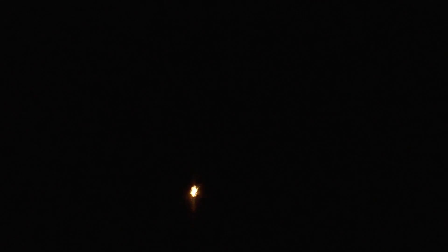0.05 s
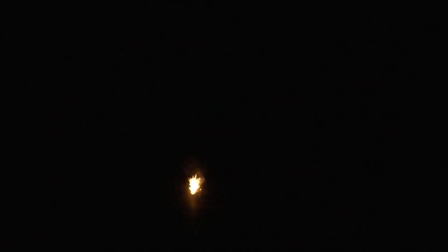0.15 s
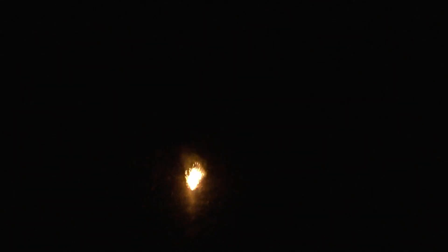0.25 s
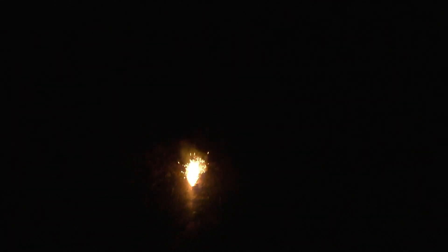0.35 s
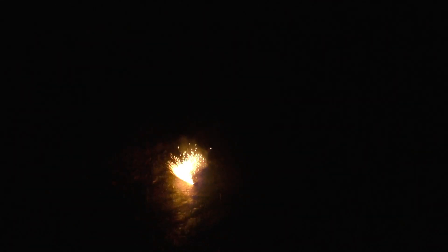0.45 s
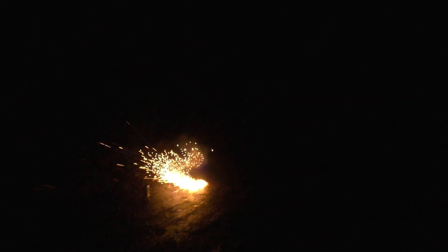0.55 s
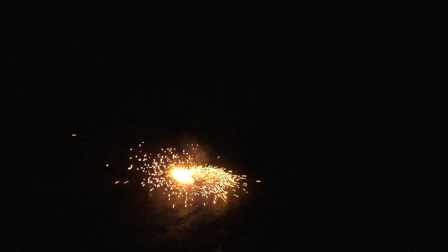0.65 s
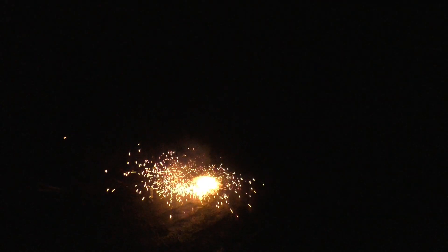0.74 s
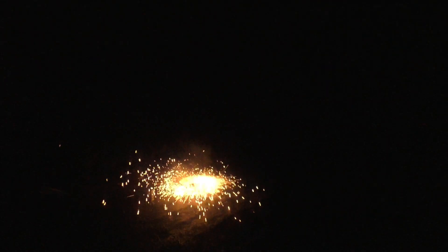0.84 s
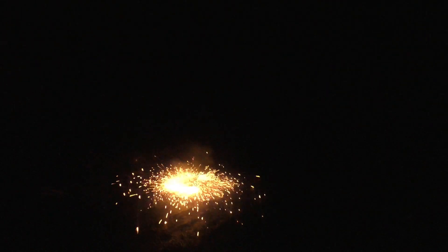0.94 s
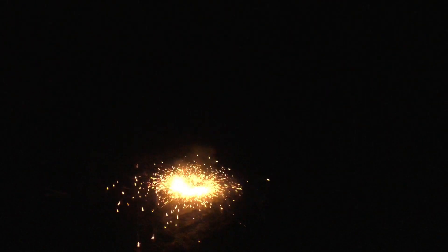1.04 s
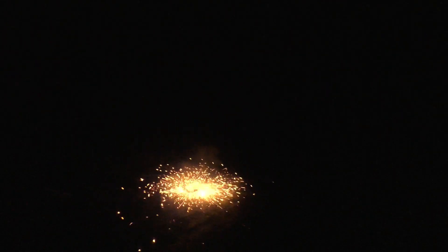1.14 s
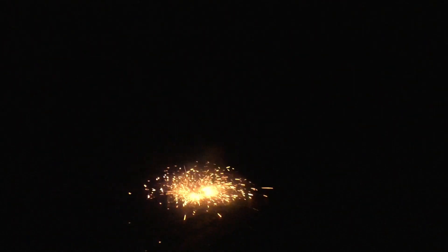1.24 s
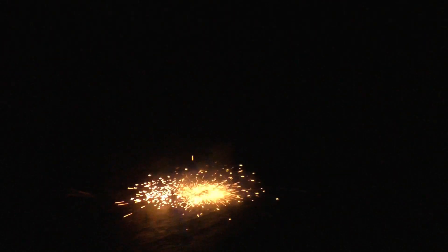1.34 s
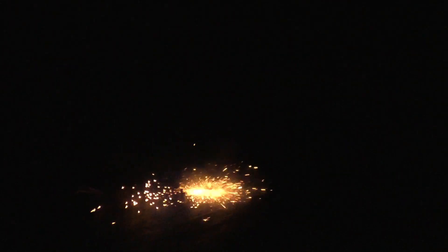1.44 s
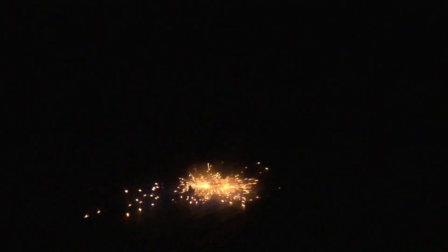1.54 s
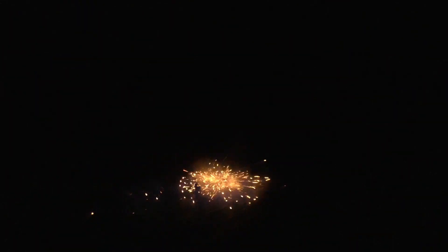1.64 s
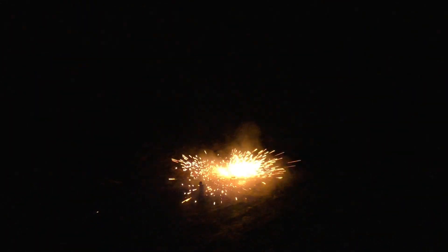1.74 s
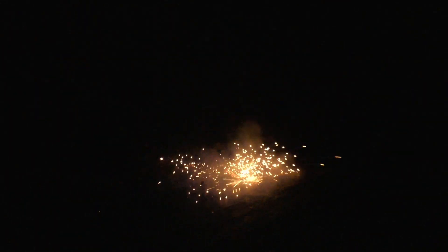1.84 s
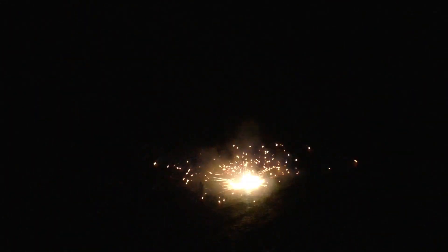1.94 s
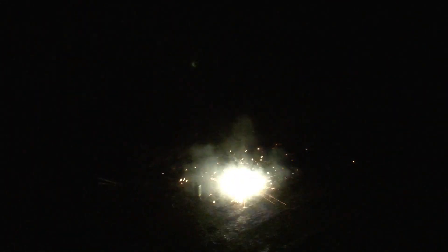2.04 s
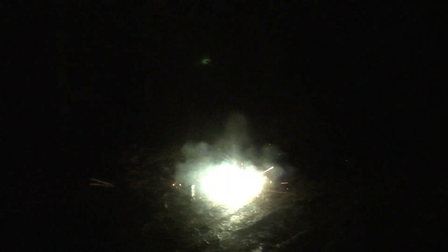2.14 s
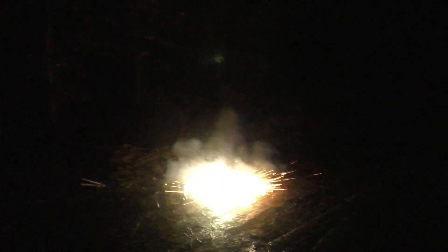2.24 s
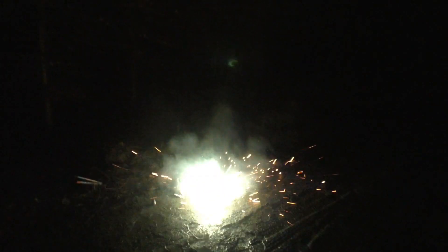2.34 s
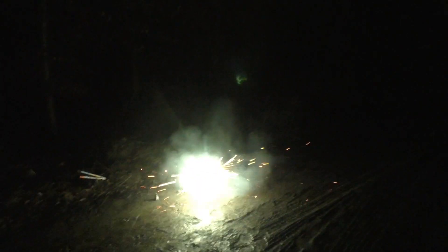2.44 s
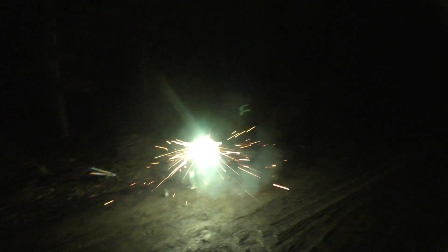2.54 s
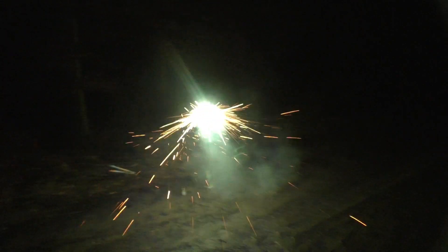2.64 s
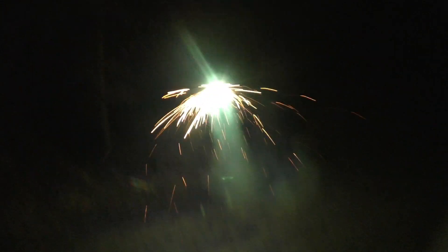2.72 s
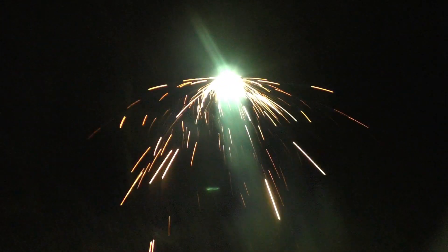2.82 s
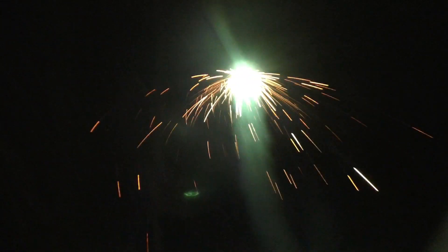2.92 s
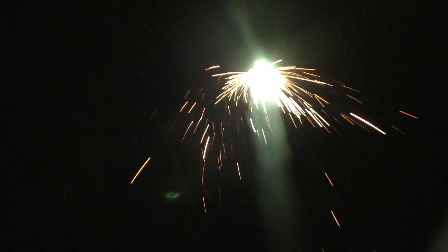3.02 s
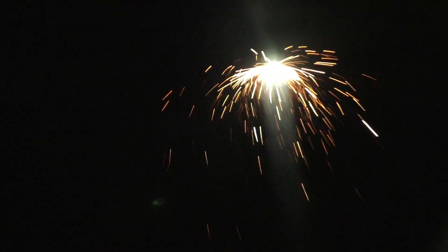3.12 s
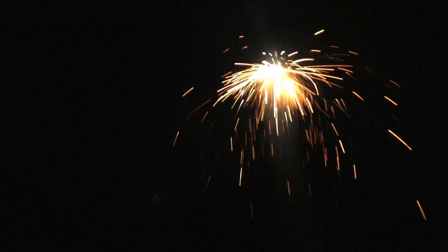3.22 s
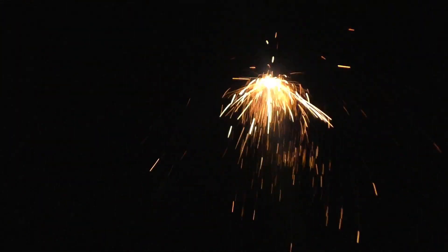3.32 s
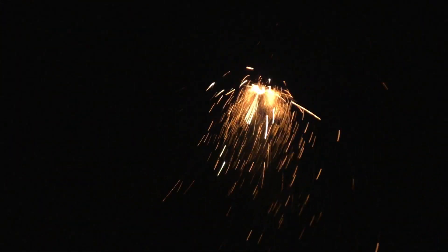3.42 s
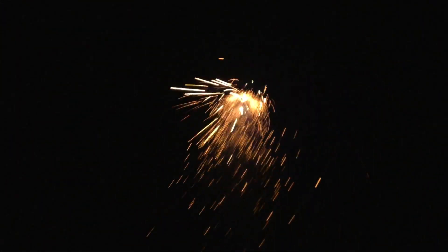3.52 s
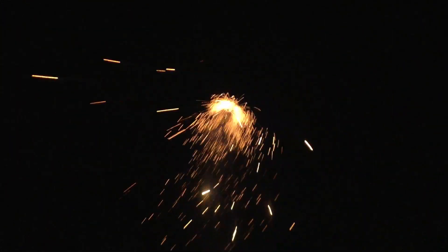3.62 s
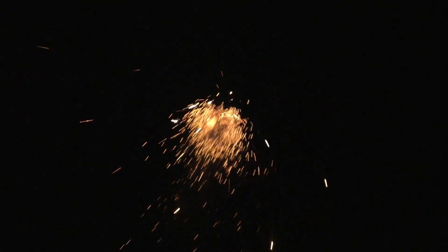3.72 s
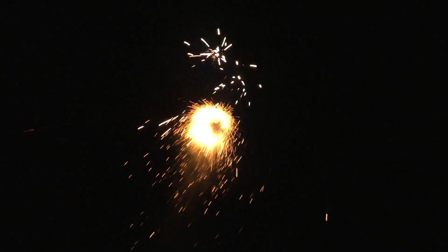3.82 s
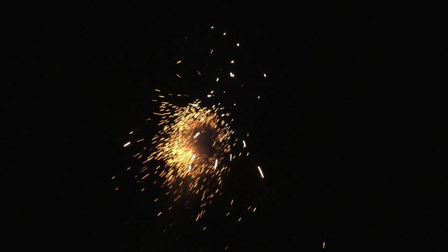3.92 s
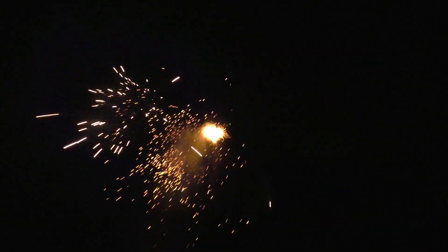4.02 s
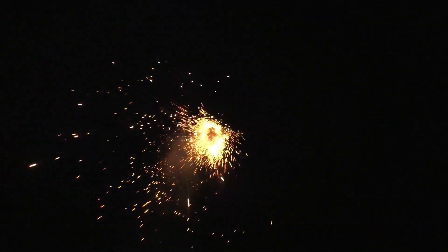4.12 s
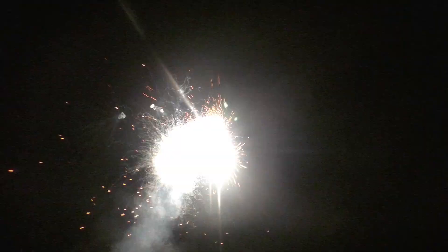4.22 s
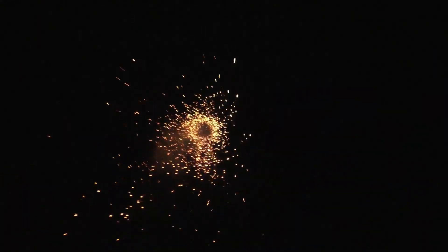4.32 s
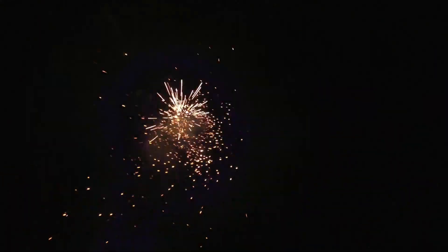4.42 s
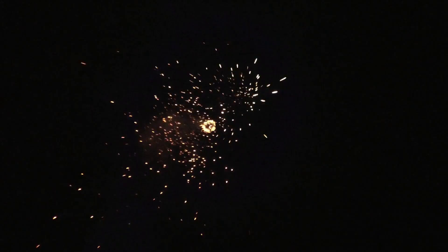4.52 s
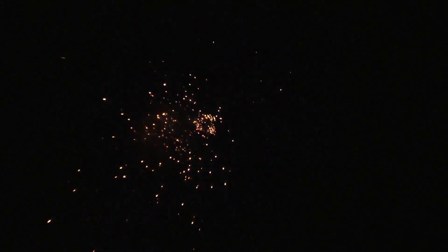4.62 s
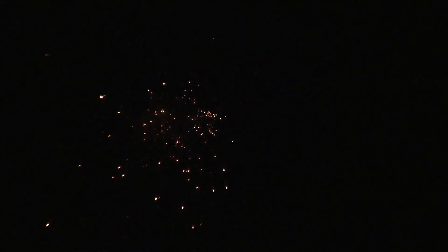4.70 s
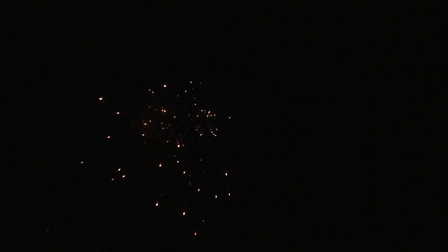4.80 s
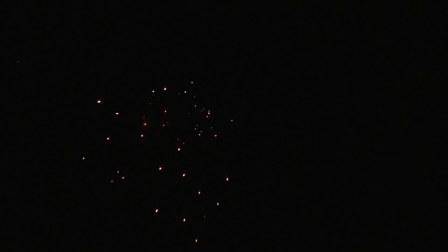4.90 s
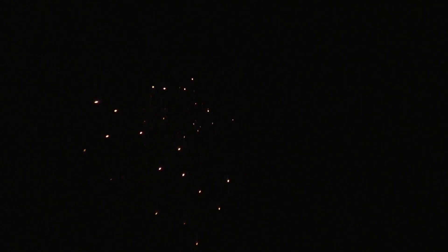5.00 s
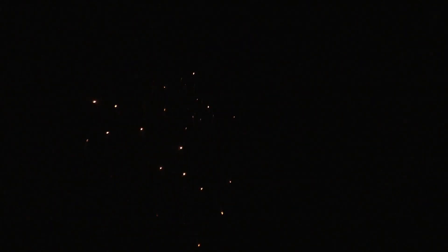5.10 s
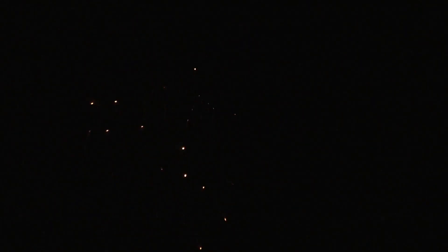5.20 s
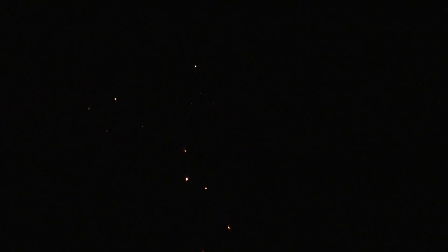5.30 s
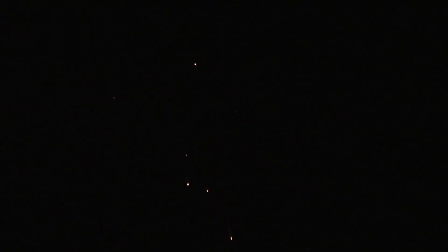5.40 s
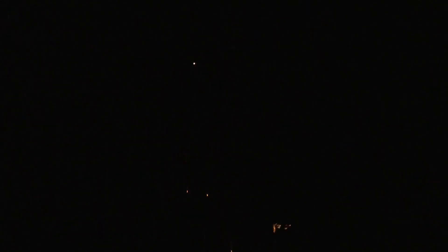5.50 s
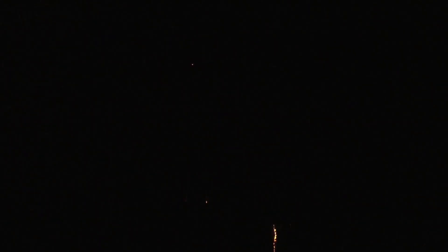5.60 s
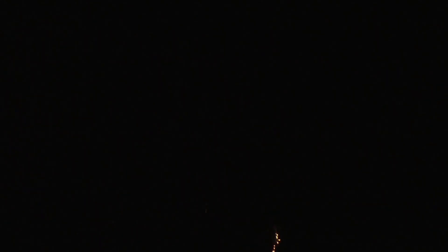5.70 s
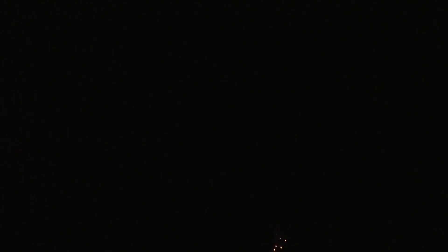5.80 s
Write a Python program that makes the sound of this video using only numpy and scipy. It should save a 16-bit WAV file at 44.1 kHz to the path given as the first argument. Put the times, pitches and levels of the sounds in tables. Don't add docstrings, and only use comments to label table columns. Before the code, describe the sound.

Thin fuse fizz swells into a fluttering, roaring hiss that rises and thins, then about twenty hard, overloaded pops ring off trees and walls.

```python
import sys
import numpy as np
from scipy import signal
from scipy.io import wavfile
from scipy.ndimage import uniform_filter1d, map_coordinates

SR = 44100
rng = np.random.default_rng(int(sys.argv[2]) if len(sys.argv) > 2 else 0)


def gain_from_db(level_db):
    decades = np.asarray(level_db, float) / 20
    return 10 ** decades


def unload_audio(sound):
    columns = np.transpose(np.atleast_2d(sound))
    steps = np.round(np.clip(columns, -1, 1) * 32767)
    wavfile.write(sys.argv[1], SR, steps.astype(np.int16))


N = 258032
T = np.arange(N) / SR

# time in seconds, hiss level in dB, throat (how deep the burn sounds) in dB,
# sparks (extra share above 10 kHz).
BURN = [(.1, -51, 11, -.55), (.2, -43.5, 3.5, -0.64), (.34, -32.5, -7.5, -0.64), (.6, -25.5, 0, -0.38),
        (1.0, -23.5, -2, 0.094), (1.78, -23, -2, -0.39), (1.81, -28.5, -0.5, 0.77),
        (1.92, -28.5, -5.5, .65), (1.98, -22, -5.5, 0.6), (2.1, -21, -0.5, 0.029), (2.33, -23, -3.5, 0.64),
        (2.4, -19, -9, 0.18), (2.85, -19, -13.5, -0.083), (3.05, -21.5, -11, -0.55), (3.41, -27, -4, 0.46),
        (3.75, -32.5, -4.5, 0.76), (3.9, -38, -9, 0.85), (4.2, -45, -11.5, .4)]
# time in seconds, speed in turns per second.
ROTATION = [(.5, 5.55), (.72, 6.49), (.92, 11.18), (1.12, 20.28), (1.32, 30.06), (1.42, 29.97),
            (1.58, 39.85), (1.82, 40.59), (2.02, 34.57), (2.23, 37.58), (2.42, 65.32), (2.95, 66.94),
            (3.3, 60.69), (3.7, 58.62), (3.9, 50)]
# frequency in Hz, likeness from 0 to 1.
LIKENESS = [(60, .85), (200, .96), (600, .972), (1700, .972), (4500, .94), (9000, .86), (15000, .66)]


def evened(x):
    return x / np.sqrt(np.mean(x ** 2) + 1e-20)


def read(points, hz):
    f, value = np.transpose(points)
    return np.interp(np.log(hz + 1), np.log(f + 1), value)


def curves(rows):
    s, *columns = np.transpose(rows)
    return [np.interp(T, s, c) for c in columns]


def add(mix, s, sound):
    part = mix[..., round(s * SR):][..., :sound.shape[-1]]
    part += sound[..., :part.shape[-1]]


def noise(shape, same, patchy_db, size=512):
    frames, hz = 4 * N // size + 5, np.fft.rfftfreq(size, 1 / SR)
    a, b, c, d, patches = rng.standard_normal((frames, len(hz), 5)).T
    patches = uniform_filter1d(patches, size=8, axis=0)
    patches = evened(uniform_filter1d(patches, size=5, axis=1))
    same = np.clip(read(same, hz), -1, 1)[:, None]
    left = a + 1j * b
    right = same * left + np.sqrt(1 - same ** 2) * (c + 1j * d)
    z = np.array([left, right]) * gain_from_db(read(shape, hz)[:, None] + patchy_db * patches)
    return evened(signal.istft(z, nperseg=size, noverlap=3 * size // 4)[1][:, :N])


def flicker(hz):
    band = signal.butter(2, [hz / 12, hz], "band", fs=SR, output="sos")
    return evened(signal.sosfilt(band, rng.standard_normal(N)))


def jet():
    # frequency in Hz, level in dB per Hz.
    hiss_spectrum = [(500, -21), (1500, -8.5), (2200, -5.5), (4500, -5), (8000, -3.5), (12000, -6.5),
                     (14000, -6.5), (16000, -14.5)]
    roar_spectrum = [(300, -26.5), (700, -3.5), (1100, -2.5), (2000, -1.5), (3500, -10.5), (6000, -11.5),
                     (9000, -34)]
    rumble_spectrum = [(40, -19.5), (100, -9.5), (250, -3), (500, -3.5), (800, -17.5), (1300, -17)]
    hiss_db, roar_db, sparks = curves(BURN)
    speed, turns = spin()

    rumble_db = -5 + 1.65 * np.minimum(roar_db, 1) + 0.5 * np.clip((speed - 50) / 10, 0, 1)

    slow_db, fast_db, blur_turns_per_s, throb_in_s = 6.4, 1.6, 23.5, .13
    throb_db = fast_db + (slow_db - fast_db) / (1 + (speed / blur_turns_per_s) ** 6)
    facing = np.cos(2 * np.pi * turns) + .3 * np.cos(4 * np.pi * turns + .6)
    started = np.clip((T - ROTATION[0][0]) / throb_in_s, 0, 1)
    sweep_db = throb_db * facing * np.clip(0.59 + speed / 45, 0, 1) * started

    burn = flicker(hz=160)
    hiss = noise(hiss_spectrum, LIKENESS, patchy_db=1.5)
    hiss = hiss * gain_from_db(sweep_db + 1.35 * burn + 0.33 * flicker(hz=500))
    top = signal.sosfiltfilt(signal.butter(2, 10000, "high", fs=SR, output="sos"), hiss)
    hiss = hiss + sparks * top
    roar = noise(roar_spectrum, LIKENESS, patchy_db=0.14)
    roar = roar * gain_from_db(roar_db - 0.5 + 0.5 * sweep_db + 1.73 * burn + 1.68 * flicker(hz=89.5))
    rumble = noise(rumble_spectrum, LIKENESS, patchy_db=1.0, size=1024)
    rumble = rumble * gain_from_db(rumble_db + 0.55 * sweep_db + 2.0 * flicker(hz=70.4))
    alive = np.clip((T - BURN[0][0]) / 0.087, 0, 1) * np.clip((BURN[-1][0] - T) / 0.25, 0, 1)
    direct = gain_from_db(hiss_db - 0.84) * alive * (hiss + roar + rumble) + sputters()

    lift_s, climb_s, climb_shape, top_path_ms = 2.235, .866, 2.6, 10.13
    climb = np.maximum(T - lift_s, 0) / climb_s
    path_ms = top_path_ms * (1 - np.exp(-climb ** climb_shape))
    share = .6 - .04 * path_ms
    wobble = 1 + .045 * uniform_filter1d(flicker(hz=60), size=200)
    late = np.arange(N) - path_ms * wobble * SR / 1000
    echo = np.array([map_coordinates(c, [late], order=3) for c in direct])
    echo = signal.lfilter([.45], [1, -.55], echo)
    lifted = np.clip((T - lift_s) / 0.029, 0, 1) * np.clip(share, 0, 1)
    return (direct + lifted * echo) / np.sqrt(1 + 0.55 * lifted ** 2)


def spin():
    speed = curves(ROTATION)[0]
    moving = T > ROTATION[0][0]
    return speed, .035 + np.cumsum(speed * moving) / SR


def sputters():
    # time in seconds, level in dB, pitch in Hz.
    lumps = [(0.826, -14, 1102), (0.913, -11.5, 1550), (0.925, -16.5, 1596), (1.205, -20, 1204),
             (1.277, -15.5, 1150), (1.368, -12, 330), (1.55, -13, 1530), (1.652, -14, 1404),
             (1.678, -12.5, 1784), (1.722, -14.5, 1235), (1.773, -15, 820), (1.786, -9, 752),
             (1.856, -19, 1270), (2.054, -11, 960), (2.075, -13, 670), (2.192, -11, 1026),
             (2.27, -15, 1145), (2.334, -18, 421), (2.35, -17, 480), (2.409, -18, 441), (2.679, -19, 899),
             (2.927, -18.5, 1733), (3.063, -17, 648), (3.113, -19.5, 1720), (3.303, -19.5, 1733),
             (3.385, -14.5, 1454), (3.463, -16, 924), (3.432, -14.5, 800), (3.653, -17.5, 1753),
             (3.751, -22.5, 482)]
    # time in seconds, level in dB, pitch in Hz.
    belches = [(0.319, -29, 205), (1.369, -24.5, 168.4), (1.55, -22.5, 200), (1.787, -15, 120),
               (2.071, -17, 160), (2.193, -25.5, 198), (2.319, -16, 206), (2.333, -30, 141),
               (2.349, -13, 233), (2.41, -22.5, 174), (2.504, -40.5, 203), (3.064, -25, 185),
               (3.31, -28, 139), (3.56, -26.5, 200), (3.713, -25, 148), (3.721, -20, 253),
               (3.736, -27, 198.7), (4.845, -35.5, 900)]
    out, u = np.zeros(N), np.arange(-600, 600) / SR

    when, size, pitch = rng.random((36, 3)).T
    when = np.interp(when, [0, 1], (.5, 3.75))
    small_db = np.interp(when, *np.transpose(BURN)[:2]) + 1.5 - 14 * size
    small_hz = np.interp(pitch, [0, 1], (700, 1800))
    flares = list(lumps) + list(zip(when, small_db, small_hz))

    swell = np.exp(-(u / 0.002) ** 2)
    for (s, db, hz), grit in zip(flares, rng.standard_normal((len(flares), 1200))):
        band = signal.butter(1, [hz / 2.26, hz * 1.51], "band", fs=SR, output="sos")
        puff = swell * evened(signal.sosfilt(band, grit))
        add(out, s + u[0], gain_from_db(db - 1.0) * puff)
    for s, db, hz in belches:
        push_pull = -np.sin(2 * np.pi * hz * u) * np.exp(-(2.83 * hz * u) ** 2)
        add(out, s + u[0], gain_from_db(db) * push_pull)
    return out


def hum():
    start_s, hold_s, end_s = 2.38, 2.77, 3.3
    db = -46.5 - 22.5 * np.maximum(T - hold_s, 0)
    fade = np.clip(np.minimum(T - start_s, end_s - T) / 0.055, 0, 1)
    return np.sqrt(2) * gain_from_db(db) * fade * np.sin(2 * np.pi * spin()[1])


def pops():
    # time in seconds, shock level in dB, suction time in ms, split of the front in ms,
    # ground echo delay in ms.
    stars = [(3.6714, 0, 0.19, 0.11, 9), (3.8653, -0.5, 0.17, 0, 9.4), (3.8769, 1, 0.11, 0, 10.3),
             (3.89, -5, .3, 0, 14), (3.8943, 1.5, 0.21, 0, 11), (3.9021, -10, 0.24, 0, 6.8),
             (3.9726, 0, 0.21, 0.12, 10.8), (4.0847, 7.5, 0.2, 0.015, 10.7), (4.117, 1, 0.19, 0.079, 9.9),
             (4.1532, 5, 0.25, 0.079, 10.5), (4.1979, -3.5, 0.27, 0.13, 9.5),
             (4.2043, -8, 0.52, 0.081, 8.3), (4.2474, -29.5, .25, 0.05, 8.7), (4.267, -1, 0.4, 0, 16),
             (4.278, -1, 0.36, 0, 10.3), (4.31, -1.5, 0.25, 0.071, 10.3), (4.3333, 1.5, 0.12, 0.13, 10.7),
             (4.3358, 6.5, 0.12, .07, 10), (4.5155, 6.5, 0.11, 0.025, 10.1),
             (4.5693, -14, 0.19, 0.088, 5.4), (4.5904, 6, 0.12, 0.069, 10.4), (5.522, -50, .1, 0, 9.2),
             (5.621, -4.5, 0.33, 0, 7.5)]
    # delay in ms, left level in dB, right level in dB.
    reflections = [
        (1.6, -9.5, -58),
        (2.6, -34.5, -30),
        (16.6, -18.5, -10.5),
        (19.4, -26, -24.5),
    ]
    direct, spread, echoes = np.zeros(N), np.zeros(N), np.zeros((2, N))
    ms = np.arange(-20, 500) * 1000 / SR
    dull, vent = signal.butter(2, 3800, fs=SR), signal.butter(1, 150, "high", fs=SR)
    blunting, heave_vent = signal.butter(1, 2600, fs=SR), signal.butter(1, 70, "high", fs=SR)

    v = np.maximum(ms, 0) / 0.7
    gas_push = 0.017 * signal.lfilter(*heave_vent, v * np.exp(1 - v))

    for (s, db, slow_ms, split_ms, ground_ms), grit in zip(stars, rng.standard_normal((len(stars), 2, 520))):
        front = np.exp(-(ms / .034) ** 2) + .85 * np.exp(-((ms - split_ms) / .03) ** 2)
        slow_ms = np.clip(slow_ms, .05, 2)
        suction = .36 * (0.28 / slow_ms) ** .6 + 1.5 * split_ms
        u = np.maximum(ms - split_ms, 0) / slow_ms
        debris = signal.lfilter(*dull, grit) * np.exp(-abs(ms - .5) / .6)
        crackle = grit[1] * np.exp(-abs(ms - .4) / .5)
        shock = 0.97 * front / front.max() - suction * u * np.exp(1 - u)
        shock = shock + .15 * debris[0] + 0.032 * crackle
        shock = gain_from_db(db) * signal.lfilter(*vent, shock)
        start = s + ms[0] / 1000
        add(direct, start, shock - gain_from_db(2.4 * db) * gas_push)
        add(spread, start, gain_from_db(0.95 * db) * shock)

        add(echoes, start, 0.046 * gain_from_db(db) * debris * [[1], [-.5]])
        blunt = signal.lfilter(*blunting, shock)
        scattered = gain_from_db(.5 * db) * (blunt + 0.45 * gain_from_db(db) * debris[1])
        add(echoes, start + ground_ms / 1000, gain_from_db([[-14], [-14.5]]) * scattered)
        returned = 0.29 * gain_from_db(.5 * db) * shock + 0.11 * scattered
        for late_ms, left_db, right_db in reflections:
            add(echoes, start + late_ms / 1000, gain_from_db([[left_db], [right_db]]) * returned)
    return direct + echoes, spread


def yard(x):
    # frequency in Hz, time to fall 60 dB in seconds.
    decay = [(100, 0.38), (500, 0.7), (1500, 0.84), (4000, 0.52), (8000, 0.46), (14000, 0.17)]
    # frequency in Hz, level in dB.
    tone = [(100, -17.5), (500, -12.5), (1500, -7), (4000, -0.5), (8000, 1.5), (15000, 1.5)]
    # frequency in Hz, level in dB.
    trees = [(300, -25.5), (1200, -15.5), (3000, -22.5), (5000, -36), (7000, -45), (10000, -66.5)]
    size = 2 * SR
    taps = np.zeros((2, size))
    slots = np.arange(760, size - 12, 12)
    at = slots + rng.integers(0, 12, (2, len(slots)))
    np.put_along_axis(taps, at, rng.standard_normal(at.shape), 1)
    taps = 0.39 * taps[0] + 0.93 * taps
    hz, t, z = signal.stft(taps, SR, nperseg=256)
    held = 0.57 * t + 0.26 * np.maximum(t - .09, 0)
    near = gain_from_db(read(tone, hz)[:, None] - 60 * held / read(decay, hz)[:, None])
    far = gain_from_db(read(trees, hz)[:, None] - 60 * t / 4.5)
    tail = signal.istft(z * (near + far), SR, nperseg=256)[1]
    return signal.fftconvolve(x[None], tail / np.linalg.norm(tail[0]), axes=1)[:, :N]


def night():
    # frequency in Hz, level in dB per Hz.
    air_spectrum = [(60, -14), (150, -20.5), (400, -20.5), (800, -15.5), (1900, -25.5), (3500, -47),
                    (6000, -56), (16000, -78)]
    wind_spectrum = [(12, -4.5), (30, 6.5), (60, -4), (120, -17), (300, -13.5), (500, -18), (900, -60.5)]
    # time in seconds, level in dB.
    fizz = [(0, -50.5), (.1, -50.5), (.3, -85)]
    # time of the peak in seconds, level in dB, half length in seconds.
    gust_list = [
        (0, -43, .7),
        (1.5, -47, .75),
        (3.6, -51, .25),
        (3.72, -32, .04),
        (4.3, -56, .5),
        (4.41, -46, .03),
        (4.66, -49, .03),
        (5.3, -52, .3),
        (5.55, -37, .06),
        (5.85, -42, .17),
    ]
    duck_in_s, release_s, recover_s = 0.63, 4.84, 0.3
    duck = np.clip(T / duck_in_s, 0, 1) * np.exp(-np.maximum(T - release_s, 0) / recover_s)
    air = gain_from_db(-47 - 10.5 * duck) * noise(air_spectrum, [(100, 0.53), (5000, 0.55)], patchy_db=0.5, size=1024)

    gusts = gain_from_db(-62)
    for s, db, half_s in gust_list:
        gusts = gusts + gain_from_db(db) * np.exp(-((T - s) / half_s) ** 2)
    opposed = [(20, -0.4), (60, -0.72), (300, 0.02)]
    lumps = gain_from_db(3.4 * flicker(hz=30))
    wind = gusts * lumps * noise(wind_spectrum, opposed, patchy_db=-2.5, size=2048)

    fuse = noise([(2000, -8), (10000, -5.0), (16000, -2.5)], LIKENESS, patchy_db=1.0)
    fuse = gain_from_db(curves(fizz)[0]) * (T < fizz[-1][0]) * fuse
    fuse = fuse + .55 * np.roll(fuse, shift=25, axis=1)
    self_noise = gain_from_db(-73.5) * rng.standard_normal((2, N))
    return air + wind + fuse + self_noise


def scene():
    flame = jet()
    bursts, fronts = pops()
    wet = yard(gain_from_db(-16.0) * fronts + gain_from_db(-30.0) * flame.mean(0))
    return gain_from_db([[.2], [-.2]]) * (flame + bursts + hum()) + wet + night()


def band_limit(x):
    return signal.sosfilt(signal.butter(12, 16430, fs=SR, output="sos"), x)


def record(dry):
    b, a = signal.iirpeak(8000, 1.8, fs=SR)
    heard = 0.8 * dry + .5 * signal.lfilter(b, a, dry)
    heard = signal.oaconvolve(heard, signal.firwin(255, 15900, fs=SR)[None], "same")
    return band_limit(np.clip(heard, -.98, .98))


dry = scene()
out = record(dry)
unload_audio(out)
```